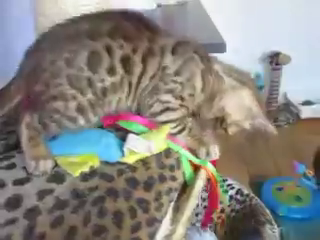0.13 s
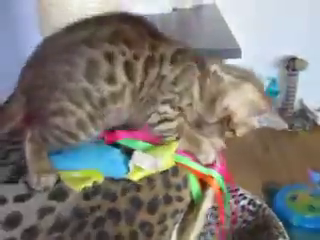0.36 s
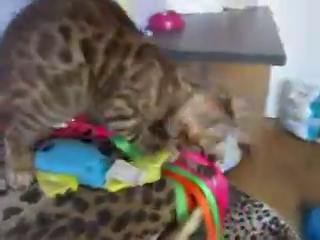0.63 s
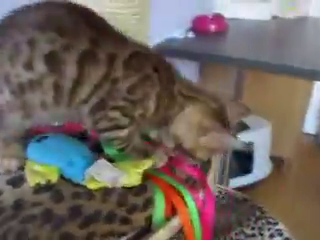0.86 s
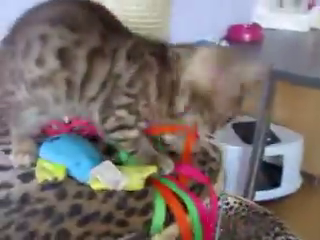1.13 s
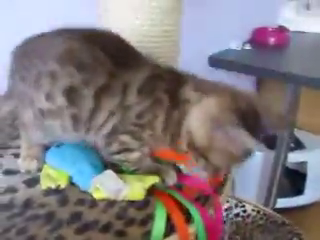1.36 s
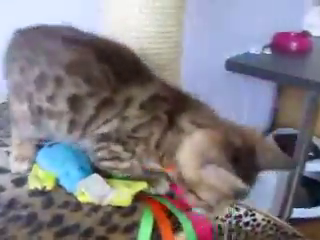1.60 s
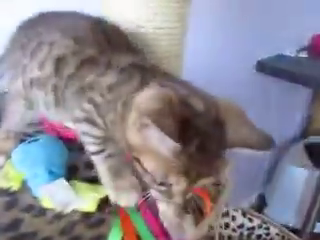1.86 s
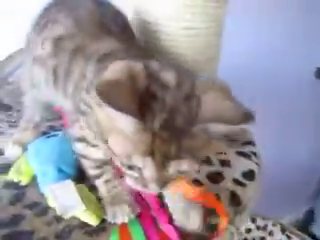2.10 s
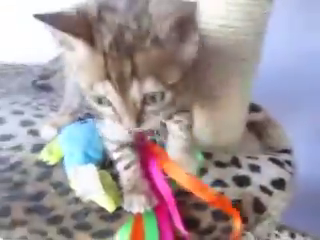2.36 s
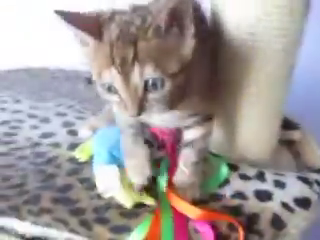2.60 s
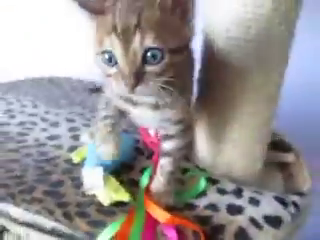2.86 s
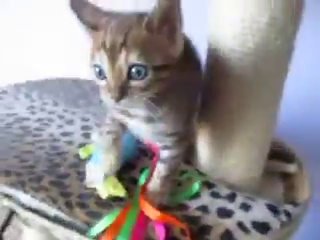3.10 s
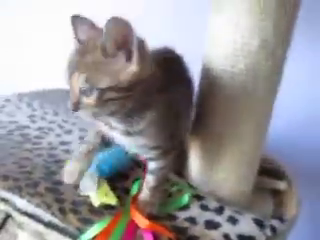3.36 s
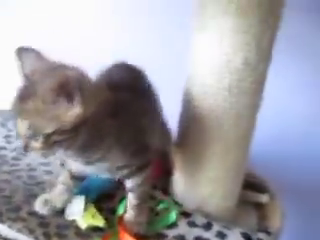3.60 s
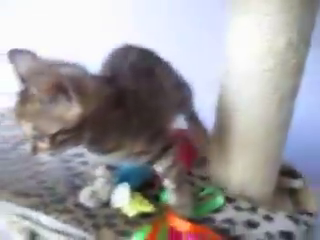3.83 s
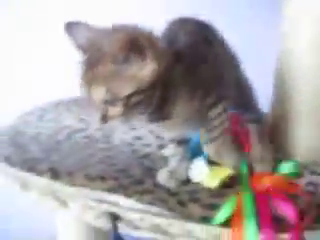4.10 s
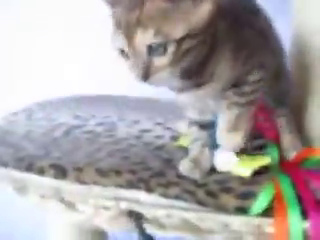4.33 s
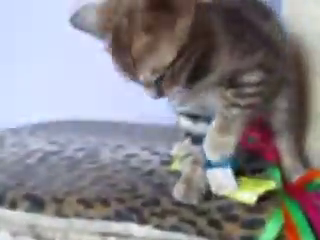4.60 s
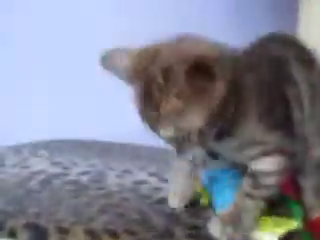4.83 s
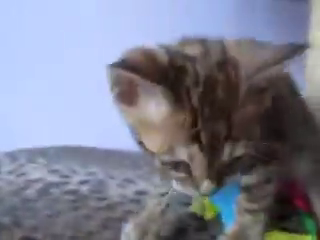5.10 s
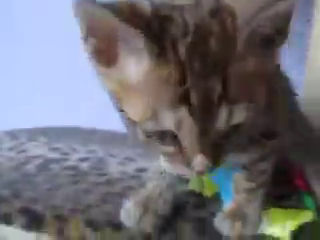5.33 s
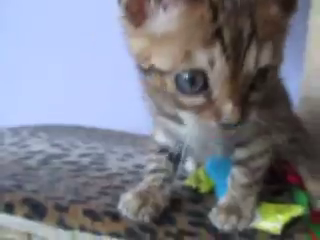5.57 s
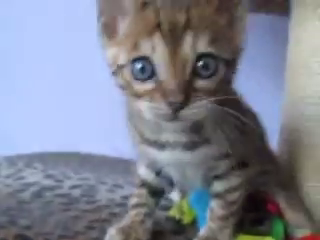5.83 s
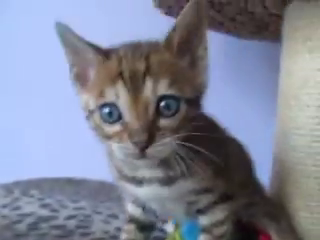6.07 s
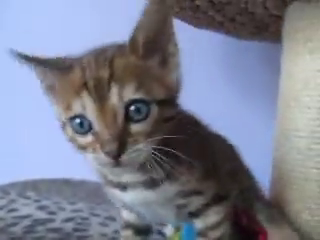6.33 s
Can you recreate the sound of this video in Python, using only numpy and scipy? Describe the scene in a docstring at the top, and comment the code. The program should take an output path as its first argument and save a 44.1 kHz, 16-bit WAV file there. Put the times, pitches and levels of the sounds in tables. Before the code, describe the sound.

A kitten scuffles with rattling toys on plush, with clacks, knocks and scratches peaking midway, then a faint peep and one short falling meow indoors.

```python
"""A kitten plays on a plush bed in a bare, lively room; cats romp nearby on a wooden floor. Paws thud, toys
knock and clack, claws scratch, and sharp ticks click close by: noise bursts excite damped resonators. Ribbons
flick in short bursts; cloth rubs and scuffs under a treble hiss, as fields of coloured noise. Near the end a
thin peep of two partials leads to one falling meow, harmonics shaped by a throat. Random echoes and two close
microphone ports place the sounds in space."""
import sys
import numpy as np
from scipy import signal
from scipy.fft import rfft, irfft
from scipy.io import wavfile
from scipy.ndimage import uniform_filter1d

SR = 44100
rng = np.random.default_rng(int(sys.argv[2]) if len(sys.argv) > 2 else 0)


def attenuation_scalar(level_db):
    """Turn a level in dB into a linear amplitude multiplier (20 dB per decade)."""
    decades = np.asarray(level_db, float) / 20
    return 10 ** decades


def master(y):
    """Save y as 16-bit WAV."""
    cut = np.clip(np.atleast_2d(y).T, -1, 1)
    pcm = np.round(cut * 32767)  # scale
    wavfile.write(sys.argv[1], SR, pcm.astype(np.int16))


N = 284372  # samples


def evened(x):
    """Normalisation: scales a signal to rms 1."""
    return x / np.sqrt(np.mean(x ** 2) + 1e-20)


def read(points, hz):
    """Interpolation of a spectrum along a logarithmic frequency axis."""
    f, value = np.transpose(points)
    return np.interp(np.log(hz + 1), np.log(f + 1), value)


def add(mix, s, sound):
    """Superposition: mixes a sound in at s seconds."""
    part = mix[max(round(s * SR), 0):][:len(sound)]
    part += sound[:len(part)]


def ring(x, hz, width):
    """Damped resonance: a two-pole filter whose bandwidth sets its decay, output scaled to peak 1."""
    r = np.exp(-np.pi * width / SR)
    y = signal.lfilter([1, 0, -1], [1, -2 * r * np.cos(2 * np.pi * hz / SR), r * r], x)
    return y / abs(y).max()


def contact(length, touch=2.54, swell=3.7):
    """Impact excitation: an impulse, weaker for long contacts, then a rattle that swells and dies."""
    u = np.arange(round(.25 * SR)) / SR / max(length, .0005)  # time in contact lengths
    blow = rng.standard_normal(len(u)) * (1 - np.exp(-swell * u)) * np.exp(-u)
    blow[0] += touch * min(0.0051 / length, 1)
    return blow


def noise_field(colour, level_db, patchy_db, flicker_db):
    """Random spectral synthesis: two unrelated noises of one colour, patchy in time and pitch."""
    frames, hz = N // 128 + 5, np.fft.rfftfreq(512, 1 / SR)
    z = rng.standard_normal((frames, 257, 5)).T
    patches = evened(uniform_filter1d(uniform_filter1d(z[4], 6, 0), 14, 1))  # over pitch, then time
    flicker = evened(uniform_filter1d(rng.standard_normal(frames), 3))
    field = attenuation_scalar(read(colour, hz)[:, None] + patchy_db * patches + flicker_db * flicker)
    pair = signal.istft((z[:2] + 1j * z[2:4]) * field, nperseg=512, noverlap=384)[1][:, :N]
    return evened(pair) * attenuation_scalar(level_db)


def background():
    """Coloured noise under one level curve: treble hiss, rub and scuff of cloth; a swish; a faint rumble."""
    # Level of the background noise over time. Each row: time in seconds, level in dB
    # before each layer takes its share.
    course = [(0, 4.5), (.45, -4), (.9, 1), (1.5, 0.5), (1.95, -1.5), (2.2, 9.5), (2.55, 12.5), (2.85, 3.5),
              (3.35, 1), (3.42, 13.5), (3.56, -3), (4.05, 0.5), (4.45, -4), (4.6, 1.5), (4.85, 2),
              (5.2, -1), (5.4, -9), (5.7, -8.5), (6.44, -3)]
    # Colours of the treble hiss, the rub and scuff of cloth, ribbon over plush and the house rumble.
    # Each row: frequency in hertz, relative level in dB.
    hiss = [(2000, -34), (3500, -6.5), (5000, 8), (7000, 9), (10000, 7.5), (15000, -9)]
    rub = [(400, -2.5), (900, -1), (1600, 1.5), (2800, 0), (4000, -5.5), (7000, -9.5)]
    scuff = [(110, -17), (190, 5), (400, 7), (800, 4), (1600, -8.5)]
    ribbon = [(150, -9), (500, -3.5), (2800, -1), (8000, 7), (14000, -6)]
    rumble = [(20, -7), (50, -6), (120, -18), (250, -17)]
    t = np.arange(N) / SR
    course_db = np.interp(t, *np.transpose(course))
    # Usual level in dB plus a share of the level curve.
    layers = noise_field(hiss, -45.5 + 0.85 * course_db, 0.46, 1.0)
    layers += noise_field(rub, -47.5 + 1.08 * course_db, 1.0, 0.11)
    layers += noise_field(scuff, -49 + 0.15 * course_db, 2.2, 0.91)
    swish_s, hold_s, rise_db_per_s, fall_db_per_s = 4.24, 0.16, 214, 223
    away_s = np.maximum(abs(t - swish_s) - hold_s / 2, 0)
    slope = np.where(t < swish_s, rise_db_per_s, fall_db_per_s)
    swish = noise_field(ribbon, np.maximum(-28.5 - slope * away_s, -100), 1.03, 0.26)
    return layers + swish + noise_field(rumble, -90, 1.7, 2.5)


def stiff_shells(mix, rows, length, touch, swell):
    """Modal impact on stiff plastic: a broad crack, with a ring as strong as the shell is free."""
    for s, db, hz, treble_db, ring_db in rows:
        blow = contact(length, touch, swell)
        shell = ring(ring(blow, hz, 340), hz, 1100)
        crack = ring(ring(blow, 330, 1570), 1210, 4370)
        top = ring(ring(blow, 3220, 5200), 2150, 6000)
        add(mix, s, attenuation_scalar(db) * (crack + attenuation_scalar(ring_db) * shell + attenuation_scalar(treble_db) * top))


def scratches(mix):
    """Frictional excitation: claws set the toy shells ringing, swelling in without a first touch."""
    # Each row: start in seconds, level in dB, ring in hertz, treble in dB and ring strength in dB
    # relative to the crack.
    strokes = [(0.09, -24, 1560, -35, -13), (0.589, -38, 2490, -20, -3), (2.14, -27.5, 1760, -21, -10.5),
               (2.291, -21.5, 2150, -4, -6), (2.458, -15, 2080, 0, -8), (2.939, -11.5, 1780, -15, -19),
               (4.622, -32, 1470, -13, -31)]
    stiff_shells(mix, strokes, 0.01, 0, 1.4)


def thuds(mix):
    """Damped plate modes: a soft pad presses the board into ringing; a few deep bumps boom far below it."""
    # Paws on floorboards. Each row: start in seconds, level in dB, board pitch in hertz,
    # low sag in dB relative to the board pitch.
    steps = [(0.137, -33, 152, -8.5), (0.454, -36, 156, -8), (0.806, -34, 234, -8),
             (1.128, -40.5, 346, 0.5), (1.546, -44.5, 240, -3), (1.931, -53.5, 150, 5),
             (2.626, -25, 270, -22), (3.308, -34, 347, -31), (3.87, -34, 235, -22), (4.749, -39, 294, -26),
             (4.78, -38.5, 151, -12), (5.3, -35, 169, -12), (5.826, -27.5, 324, -17),
             (5.948, -35.5, 160, -17), (6.28, -33.5, 227, -41), (6.36, -24.5, 167, -23)]
    # Deep bumps. Each row: start in seconds, level in dB.
    bumps = [(5.83, -31.5), (6.392, -36.5)]
    for s, db, hz, sag_db in steps:
        push = contact(0.018)
        board = ring(ring(push, hz, 30), hz, 470)
        sag = ring(ring(push, 70, 50), 70, 90)
        add(mix, s, attenuation_scalar(db) * (board + attenuation_scalar(sag_db) * sag))
    for s, db in bumps:
        boom = ring(ring(contact(0.047), 27, 30), 35, 60)
        add(mix, s, attenuation_scalar(db) * boom)


def flicks(mix):
    """Broadband transients: ribbons and claws flick on cloth in thin puffs of treble."""
    # Each row: start in seconds, level in dB, length in seconds.
    puffs = [(0.159, -25, 0.02), (0.32, -20, 0.0057), (0.577, -27, 0.0051), (0.755, -14.5, 0.004),
             (0.793, -26, 0.012), (1.734, -15, 0.00093), (2.218, -22, 0.0058), (2.622, -18.5, 0.012),
             (3.123, -19.5, 0.0061), (3.374, -38, 0.035), (4.642, -22, 0.019), (5.78, -29.5, 0.0074)]
    for s, db, length in puffs:
        add(mix, s, attenuation_scalar(db) * ring(ring(contact(length), 6100, 16000), 3900, 14000))


def clacks(mix):
    """Modal impact: a hard first touch cracks against stiff toy shells."""
    # Each row: start in seconds, level in dB, ring in hertz, treble in dB and ring strength in dB
    # relative to the crack.
    blows = [(0.1741, -26.5, 1220, -10, -11), (0.282, -28.5, 1560, -29, -4), (0.3148, -21, 2450, -12, -40),
             (0.8, -33, 1690, -10, -8), (2.375, -6.5, 1690, -1, -16), (2.5362, -9, 1530, -8, -15),
             (2.913, -19.5, 2150, -36, -23), (3.2229, -14.5, 2340, -21, -9.5),
             (3.5689, -29.5, 1700, -20, -26), (4.383, -25, 1950, -26, -21), (4.655, -22.5, 1430, -1, -41),
             (5.173, -38, 2370, 7, 2.5), (5.7766, -16, 1910, -5, -3.5), (6.4243, -21, 2840, 6.5, -9)]
    stiff_shells(mix, blows, 0.008, 4.7, 2.7)


def ticks(mix):
    """Heavily damped impact: each close tick is one short broad pulse."""
    # Each row: start in seconds, level in dB, centre in hertz.
    clicks = [(0.2212, -7, 1830), (3.9498, -15, 810), (3.961, -12.5, 740)]
    for s, db, hz in clicks:
        add(mix, s, attenuation_scalar(db) * ring(contact(0.0014, 7.7), hz, 1.5 * hz))


def knocks(mix):
    """Modal impact on soft hollow bodies: padding low-passes the blow but lets a snap through above."""
    # Toys and furniture. Each row: start in seconds, level in dB, body pitch in hertz,
    # contact length in seconds, snap in dB before a fixed reduction.
    blows = [(0.518, -25, 480, 0.0053, 2.5), (0.593, -29.5, 605, 0.0078, 12),
             (0.658, -34.5, 430, 0.012, 12.5), (0.799, -38.5, 780, 0.0024, 13),
             (0.923, -40.5, 355, 0.01, -8), (1.119, -27.5, 485, 0.002, 12.5),
             (1.531, -39.5, 457, 0.0073, -8), (1.606, -38.5, 430, 0.0091, -14),
             (1.73, -15, 384, 0.00051, -12), (2.09, -31, 458, 0.0015, 9.5), (2.11, -29, 473, 0.008, 12),
             (2.296, -26, 590, 0.014, 12), (2.352, -25, 467, 0.012, -6), (2.53, -15.5, 450, 0.0065, 12),
             (2.557, -24, 506, 0.0023, 23), (2.627, -16, 347, 0.0049, 11), (2.649, -20, 393, 0.002, -2),
             (2.7647, -16.5, 430, 0.004, 9), (2.945, -31, 680, 0.016, -9), (3.047, -19, 510, 0.0051, 5.5),
             (3.219, -30, 485, 0.0032, -6), (3.856, -19.5, 480, 0.0076, -1), (4.305, -22.5, 494, 0.0037, 1),
             (4.659, -37.5, 580, 0.0098, -4), (5.287, -46, 258, 0.017, -2), (5.369, -44.5, 283, 0.026, 8),
             (5.722, -44, 700, 0.038, -3), (6.285, -38.5, 336.8, 0.019, -8),
             (6.365, -34.5, 330, 0.017, -11)]
    padded = signal.butter(3, 1150, fs=SR, output="sos")
    for s, db, hz, length, snap_db in blows:
        bare = contact(length, 2.84)
        blow = signal.sosfilt(padded, bare)
        body = ring(ring(blow, hz, 415), hz, 600) + attenuation_scalar(0.5) * ring(blow, 313, 336)
        snap = ring(ring(bare, 1170, 1400), 960, 1900)
        add(mix, s, attenuation_scalar(db) * (body + attenuation_scalar(snap_db - 10.5) * snap))


def hollow_toy(mix):
    """Shell modes: a short hard contact, bouncing once, rings nearly evenly spaced bands."""
    # Each row: start in seconds, level in dB.
    hits = [(2.6986, -10.5), (2.7074, -9)]
    # Ringing bands. Each row: frequency in hertz, filter width in hertz, level in dB.
    bands = [(1420, 750, -0.5), (2600, 560, 2), (3930, 510, -3), (5180, 480, -3.5), (6540, 570, -13.5)]
    for s, db in hits:
        blow = contact(0.002, 3.2)
        shell = sum(attenuation_scalar(band_db) * ring(ring(blow, hz, w), hz, w) for hz, w, band_db in bands)
        add(mix, s, attenuation_scalar(db) * shell)


def peep(mix):
    """Two wavering partials: a faint fuzzy tone swells and fades while its octave flares and trails off."""
    t = np.arange(0, 0.23, 1 / SR)
    wobble = evened(uniform_filter1d(rng.standard_normal((2, len(t))), 500, 1))
    phase = 2 * np.pi * 1020 * t + .45 * wobble[0]
    octave_db = 4.0 - np.maximum(700 * (.045 - t), 55 * (t - .045))  # slopes in dB/s
    tone = np.sin(phase) + attenuation_scalar(octave_db) * np.sin(2 * phase)
    tone *= attenuation_scalar(3.5 * wobble[1])
    top_s, rise_db_per_s, fall_db_per_s = 0.05, 196, 23
    level_db = -38 - np.maximum(rise_db_per_s * (top_s - t), fall_db_per_s * (t - top_s))
    add(mix, 5.735, attenuation_scalar(level_db) * tone * signal.windows.tukey(len(t), .1))


def meow(mix):
    """Source-filter voice: harmonics of unsteady folds glide down through throat resonances and rasp."""
    # Each row: time in seconds, pitch in hertz before the folds waver, effort in dB.
    glide = [(5.962, 603, -32), (5.995, 564, -27), (6.05, 541, -25), (6.11, 504.5, -23), (6.20, 484, -28),
             (6.30, 453, -35.5), (6.391, 442.4, -47)]
    # Throat resonances, then upper ones before their fading.
    # Each row: frequency in hertz, width in hertz, level in dB.
    throat = [(450, 73, -5), (950, 120, -5), (1080, 59, -1), (1444, 210, -2), (1988, 282, 11),
              (2850, 750, -7)]
    nasal = [(3800, 3800, 10), (9350, 2500, -8)]
    s, *columns = np.transpose(glide)
    t = np.arange(s[0], s[-1], 1 / SR)
    since = t - s[0]
    hz, effort_db = (np.interp(t, s, c) for c in columns)
    hz = hz * (1 + .0035 * evened(uniform_filter1d(rng.standard_normal(len(t)), 300)))
    turns, k = np.cumsum(hz) / SR, np.arange(1, 24)[:, None]  # fundamental cycles, harmonic numbers

    def peak(modes):
        """Resonance curves sampled at the moving harmonics."""
        return sum(attenuation_scalar(db) / (1 + (2 * (k * hz - f) / w) ** 2) ** 1.53 for f, w, db in modes)

    bright_db = -13.5 - 69 * since  # the upper resonances fade as the mouth closes
    airy = [(6870 - 2600 * since, 1360, -14)]  # a top resonance slides down
    weights = peak(throat) + attenuation_scalar(bright_db) * peak(nasal) + peak(airy)
    hoarse = .08 + .03 * k + .55 * since  # more for higher harmonics and as the call tires
    rasp = 1 + hoarse * evened(uniform_filter1d(rng.standard_normal((23, len(t))), 160, 1))
    rasp *= attenuation_scalar(3.6 * evened(uniform_filter1d(rng.standard_normal(rasp.shape), 1800, 1)))  # slow patches
    voice = (weights * rasp * np.cos(2 * np.pi * k * turns + k ** 2)).sum(0)
    voice /= np.sqrt((weights ** 2).sum(0) / 2)
    add(mix, s[0], attenuation_scalar(effort_db) * voice * signal.windows.tukey(len(t), .08))


def room(x, wet_db):
    """Reverberation: direct sound plus sparse taps dying band by band; row two has unrelated echoes only."""
    # Each row: frequency in hertz, time to decay by 60 dB in seconds.
    decay = [(100, 0.51), (400, 0.34), (1040, 0.47), (2760, 0.29), (6000, 0.39), (12000, 0.069)]
    taps = np.zeros((2, SR // 2 + SR // 4))
    slots = np.arange(200, taps.shape[1] - 20, 20)
    at = slots + rng.integers(0, 20, (2, len(slots)))
    np.put_along_axis(taps, at, rng.choice([-1., 1.], at.shape), 1)
    hz, t, z = signal.stft(taps, SR, nperseg=256)
    z = z * attenuation_scalar(-60 * t / read(decay, hz)[:, None])
    z /= np.sqrt((abs(z) ** 2).sum(2, keepdims=True))  # equal energy in every band
    tail = signal.istft(z, SR, nperseg=256)[1]
    tail = attenuation_scalar(wet_db) * tail / np.linalg.norm(tail[0])
    tail[0, 0] += 1
    return signal.fftconvolve(x[None], tail, axes=1)[:, :N]


def crossfaded_room(x, wet_db):
    """Reverberation by cross-fading three random echo patterns, so no single one colours every sound."""
    turn = 2 * np.pi * 3.1 * np.arange(N) / SR
    share = [np.sqrt(2 / 3) * abs(np.cos(turn / 2 + k * np.pi / 3)) for k in range(3)]
    direct = np.array([x * (1 - sum(share)), 0 * x])  # keeps the direct sound at unit gain
    return direct + sum(room(x * w, wet_db) for w in share)


def ports(pair, spread):
    """Partial coherence: two close microphone ports share most sound, with level and phase offsets."""
    # Each row: frequency in hertz, left-right likeness before the power of spread.
    likeness = [(60, 0.063), (200, 0.93), (500, 1), (2000, 0.99), (5000, 0.97), (9000, 0.68), (14000, 0.78)]
    # Each row: frequency in hertz, left minus right in dB.
    tilt = [(30, 14), (150, -6), (600, -3), (2000, -2), (5000, -3), (8500, -8.5), (13000, -3)]
    # Each row: frequency in hertz, lead of the left port in radians.
    lead = [(7000, 0), (9000, .6), (11000, 1.9), (13000, 4.2)]
    common, other = rfft(pair)
    hz = np.fft.rfftfreq(N, 1 / SR)
    same = np.clip(read(likeness, hz), 0, 1) ** spread
    right = same * common + np.sqrt(1 - same ** 2) * other
    right = right * np.exp(-1j * read(lead, hz))
    half = attenuation_scalar(read(tilt, hz) / 2)
    return irfft(np.array([common * half, right / half]), N)


def scene():
    """Superposition of sources, each a pair (common part, unrelated part); ticks fall nearer the left port."""
    low, mid, high, near, cat = np.zeros((5, N))
    noise = background()
    scratches(high)
    thuds(low)
    flicks(high)
    clacks(high)
    ticks(near)
    knocks(mid)
    hollow_toy(high)
    peep(cat)
    meow(cat)
    # Small bodies radiate no deep bass.
    mid = signal.sosfilt(signal.butter(2, 150, "high", fs=SR, output="sos"), mid)
    far = crossfaded_room(low, 2.7) + crossfaded_room(mid, 2.53) + crossfaded_room(high, 1.95)
    close = ports(room(near, -27), 1) * attenuation_scalar([[3], [-6]])  # left and right gain in dB
    return ports(far + room(cat, -3.5), 0.65) + close + ports(noise, 2.5)


def roll_off(x):
    """The treble ends steeply here."""
    return signal.sosfilt(signal.butter(12, 15610, fs=SR, output="sos"), x)


def record(dry):
    """Linear filtering: opposite-phase capsule noise joins the scene, then a housing notch and treble loss."""
    # Self-noise of the capsules, raised in the bass by stereo widening.
    # Each row: frequency in hertz, relative level in dB.
    capsule = [(30, -47), (170, -2.5), (700, -10.5), (1500, -19.5), (5000, -27), (12000, -36)]
    # Microphone response. Each row: frequency in hertz, gain in dB.
    response = [(30, -12), (100, 1), (3000, -6), (4000, -15), (5000, -11.5), (7000, -14), (10000, -18),
                (12000, -23.5), (15000, -38)]
    widened = noise_field(capsule, -44.5, 0.97, 0.3)[0] * np.array([[1], [-1]])
    colour = attenuation_scalar(read(response, np.fft.rfftfreq(N, 1 / SR)))
    mix = irfft(rfft(dry + widened) * colour, N)
    return roll_off(mix)


dry = scene()
out = record(dry)
master(out)
```